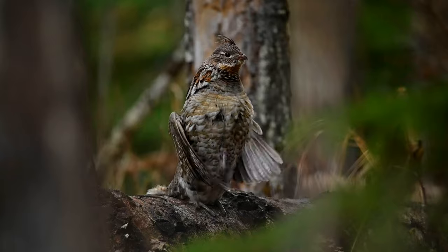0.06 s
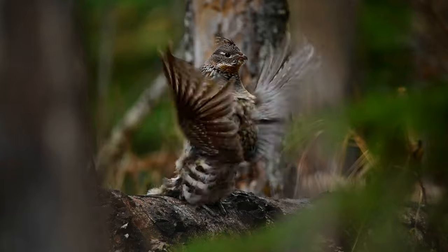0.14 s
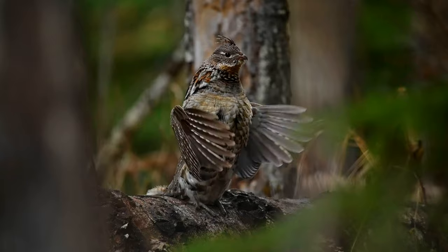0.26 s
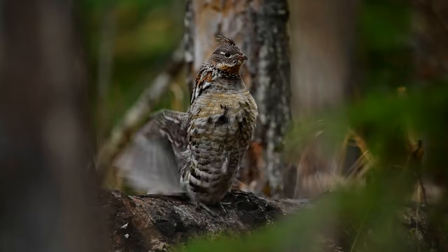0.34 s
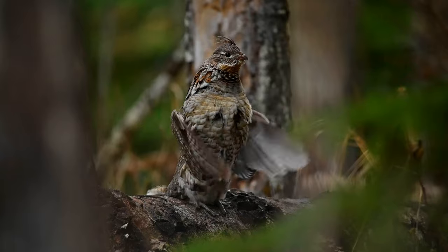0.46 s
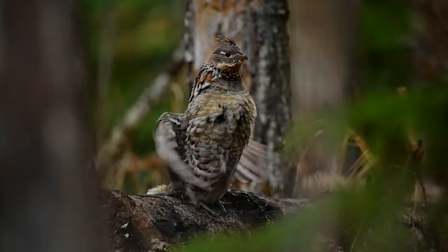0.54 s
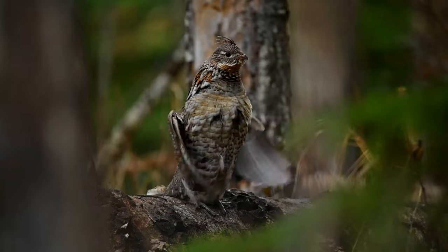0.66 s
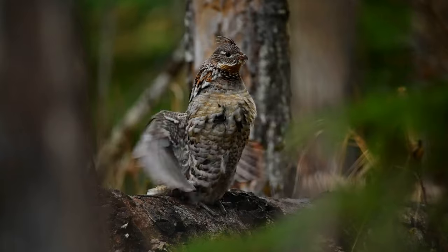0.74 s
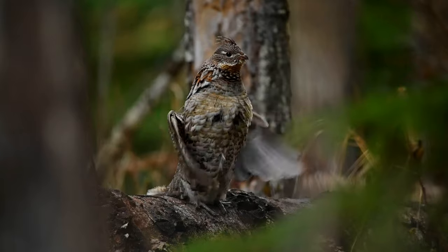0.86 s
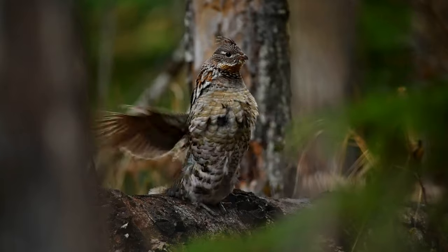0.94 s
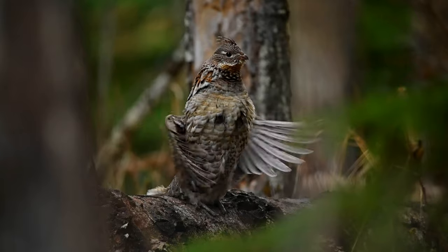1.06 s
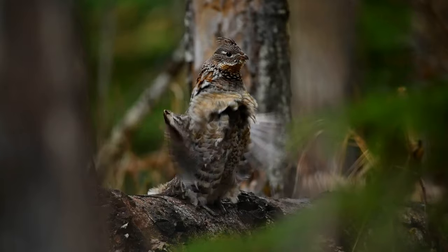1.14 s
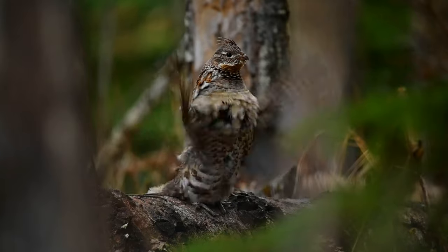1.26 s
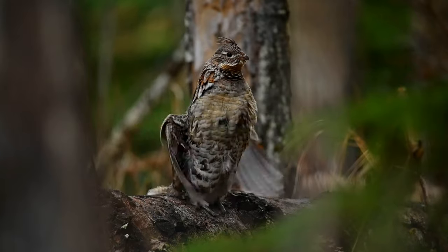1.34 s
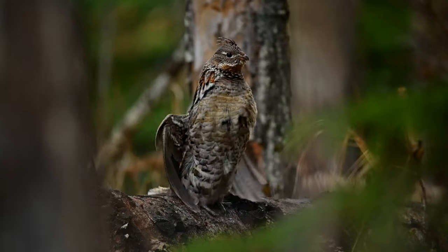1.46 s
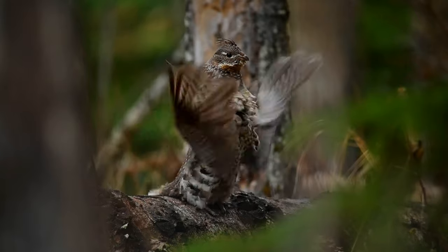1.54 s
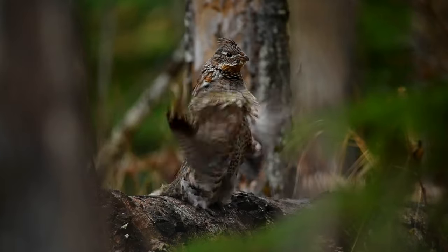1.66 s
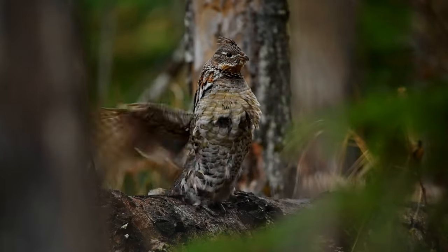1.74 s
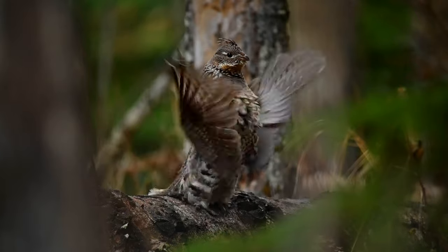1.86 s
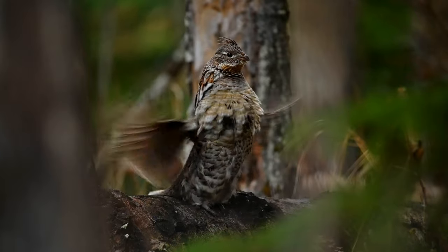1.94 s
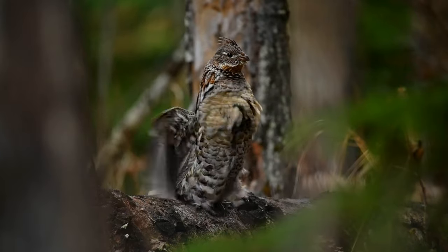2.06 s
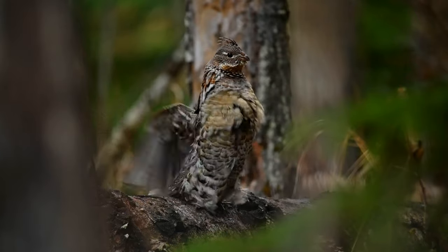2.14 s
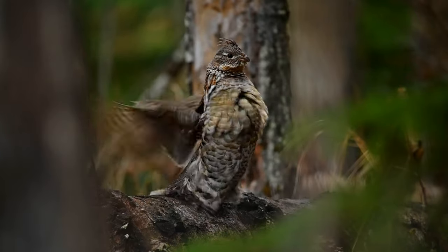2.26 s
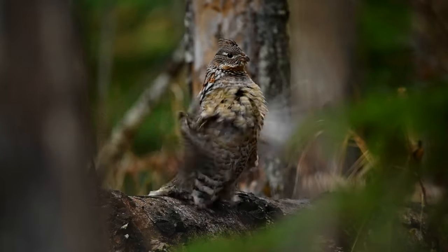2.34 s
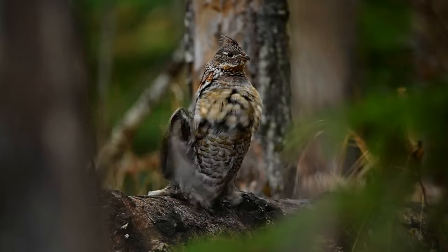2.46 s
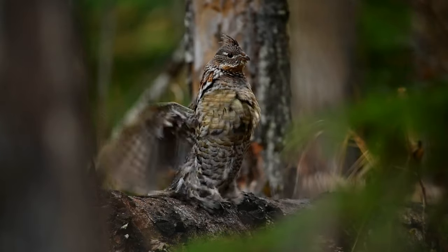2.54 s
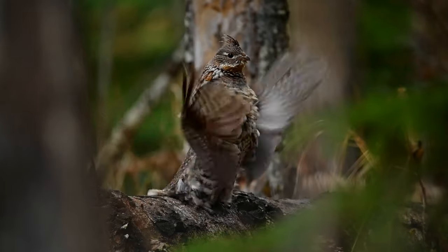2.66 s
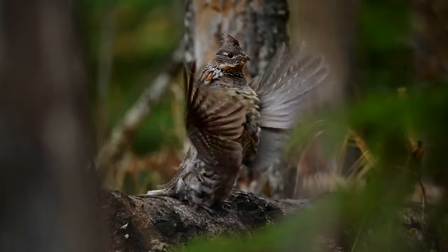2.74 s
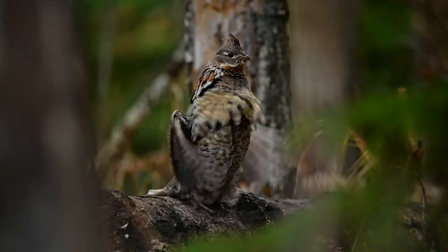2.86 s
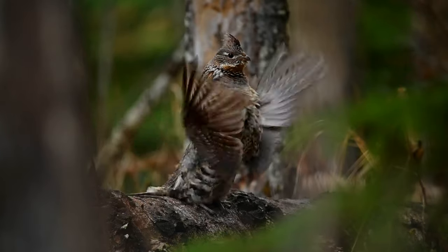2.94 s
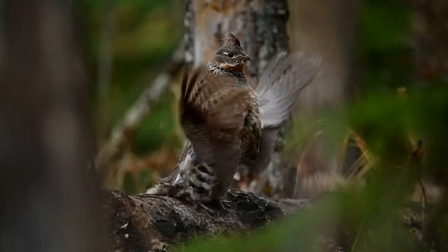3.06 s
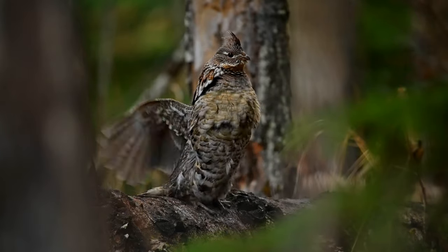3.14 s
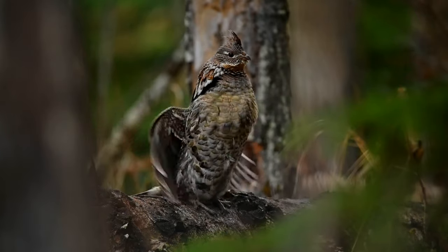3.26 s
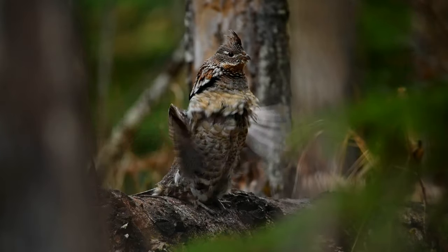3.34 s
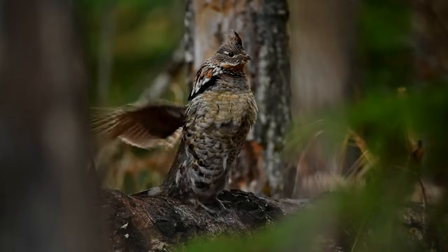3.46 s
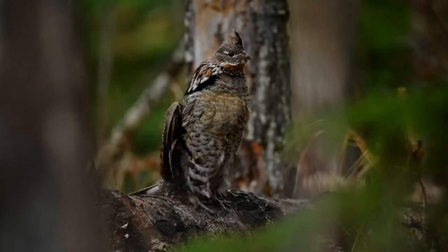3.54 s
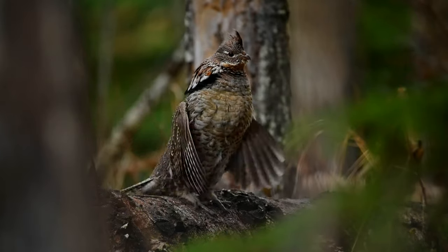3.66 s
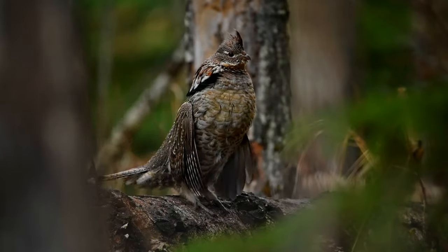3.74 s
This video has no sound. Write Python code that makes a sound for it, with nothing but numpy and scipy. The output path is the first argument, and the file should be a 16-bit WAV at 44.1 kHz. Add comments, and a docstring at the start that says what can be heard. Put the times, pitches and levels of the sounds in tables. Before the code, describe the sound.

Grouse wing drumming, close and nearly all in the left channel. Deep, soft thumps, each led by a faint feathery swish, begin at 0.2 s about four per second, and quicken steadily to a low churning whir with rustling, flicking feathers around 2.4 s. They then slow and weaken until 3.6 s, echoing among trees. Faint thin chirps between 0.3 and 1.9 s; very quiet distant murmur, hum and hiss throughout.

```python
"""From the start a distant murmur, rumble and hiss (coloured noise) lie under the wood; faint hums (sines) come and go.
A ruffed grouse, close and almost wholly on the left, drums on a log: each wing stroke shoves out one deep
pulse of air (a damped resonance) led by a swish of feathers (shaped noise), and trunks echo the thumps.
Early on a small bird gives thin high chirps (gliding sines). The strokes quicken to a whir of churning air,
rustling and flicking feathers (noise), then slow and fade."""
import sys
import numpy as np
from scipy import signal
from scipy.fft import rfft, irfft
from scipy.io import wavfile
from scipy.ndimage import uniform_filter1d

SR = 44100
rng = np.random.default_rng(int(sys.argv[2]) if len(sys.argv) > 2 else 0)


def digitize_waveform(pressure):
    """Quantize a signal to 16-bit integers and store it at the path in sys.argv[1].

    Rows of a 2-D input are taken as channels; values are limited to [-1, 1].
    """
    field = np.atleast_2d(pressure).T
    bounded = np.clip(field, -1, 1)
    quanta = np.round(bounded * 32767).astype(np.int16)
    wavfile.write(sys.argv[1], SR, quanta)


N = 169785
T = np.arange(N) / SR  # time [s]


def undb(db):
    """Logarithmic level: decibels to amplitude gain."""
    return 10 ** (np.asarray(db) / 20)


def level_at(points):
    """Linear interpolation in decibels: the level [dB] over time through (time, level) points."""
    time, db = np.array(points).T
    return np.interp(T, time, db)


def noise(points):
    """Spectral shaping: white noise coloured by (frequency, density) points, scaled to rms 1."""
    hz, db = np.array(points, float).T
    f = np.fft.rfftfreq(N, 1 / SR) + 1  # 1 Hz up, so that the logarithm exists at zero
    gain = undb(np.interp(np.log(f), np.log(hz), db))
    x = irfft(rfft(rng.standard_normal(N)) * gain, N)
    return x / x.std()


def walk(rate):
    """Random modulation: held random steps at a rate [Hz], smoothed over one step, with a spread of 1."""
    step = max(int(SR / rate), 1)
    held = np.repeat(rng.standard_normal(N // step + 1), step)
    x = uniform_filter1d(held, step)[:N]
    return x / x.std()


def on_left(x, right_db):
    """Level difference between channels: full on the left, right_db relative to it on the right."""
    return np.array([x, x * undb(right_db)])


def woods(x, t60, onset):
    """Multiple scattering: many trunks return a noise tail that builds up, then decays 60 dB in t60 [s]."""
    decay = np.exp(-np.log(1000) * T / t60)
    build_up = 1 - np.exp(-(T / onset) ** 2)
    tail = rng.standard_normal(N) * decay * build_up
    unit_energy_tail = tail / np.sqrt(np.sum(tail ** 2))
    return signal.fftconvolve(x, unit_energy_tail)[:N]


# colours of the distant murmur, low rumble and fine hiss: (frequency [Hz], relative density [dB per Hz])
MURMUR_COLOUR = [(20, -14), (45, -9), (80, 3.5), (130, -4.5), (220, 1), (350, -1.5), (550, -2.5),
                 (800, -0.5), (1100, -6.5), (1400, -18), (2000, -29), (4000, -25.5), (15500, -33)]
RUMBLE_COLOUR = [(15, -45), (28, -24), (42, -18.5), (80, 3), (120, -12), (165, -6.5), (220, -19),
                 (400, -35), (1500, -54), (15500, -64)]
HISS_COLOUR = [(100, -12), (1500, -2), (2450, -8), (3300, -5), (5800, -3.5), (9000, -2), (12000, -3),
               (15500, -2.5)]
# slow course of the murmur: (time [s], level [dB])
MURMUR_COURSE = [(0, -64.5), (1.0, -64.5), (1.7, -63), (2.4, -63.5), (3.2, -63), (3.85, -63)]
RUMBLE_LEFT_DB, RUMBLE_RIGHT_DB, HISS_LEFT_DB, HISS_RIGHT_DB = -47.5, -60, -67, -74.5


def background():
    """Coherence: the murmur is alike in both channels, so centred; rumble and hiss are independent."""
    murmur = noise(MURMUR_COLOUR) * undb(level_at(MURMUR_COURSE))
    left = undb(RUMBLE_LEFT_DB) * noise(RUMBLE_COLOUR) + undb(HISS_LEFT_DB) * noise(HISS_COLOUR)
    white_hiss = rng.standard_normal(N)
    right = undb(RUMBLE_RIGHT_DB) * noise(RUMBLE_COLOUR) + undb(HISS_RIGHT_DB) * white_hiss
    return murmur + np.array([left, right])


# distant tones: (start [s], end [s], mean frequency [Hz], mid-tone rms level before sway [dB])
HUM_TONES = [(.3, 0.947, 434, -74.5), (0.903, 1.847, 437, -72), (1.75, 2.997, 437, -75),
             (2.895, 3.793, 436, -70.5), (1.96, 3.112, 591, -75), (2.912, 3.897, 77.4, -66)]


def hum(waver=0.0019, sway_db=1.2, fade_s=0.11):
    """Frequency and amplitude modulation: faint far-off sines waver in pitch and sway in level."""
    x = np.zeros(N)
    for start, end, hz, db in HUM_TONES:
        fade = np.clip(np.minimum(T - start, end - T) / fade_s, 0, 1)
        envelope = fade * undb(db + sway_db * walk(6.1))
        phase = 2 * np.pi * np.cumsum(hz * (1 + waver * walk(12))) / SR
        x += np.sqrt(2) * envelope * np.sin(phase)  # root 2 gives the sine an rms of 1
    return x


# chirps: (start [s], length [s], start frequency [Hz], end frequency [Hz],
#          direct mid-note rms level before fuzz [dB], level sent to the trees [dB])
CHIRP_NOTES = [(.312, 0.033, 6750, 7650, -69.5, -70), (0.46, 0.049, 6960, 7900, -69, -63.5),
               (1.236, 0.05, 7000, 7600, -63, -61.5), (1.407, 0.056, 7090, 6950, -67, -67),
               (1.825, 0.038, 7480, 7800, -59.5, -67)]
CHIRP_FUZZ_DB, CHIRP_FUZZ_HZ = -10, 597  # depth and rate of the random level modulation
CHIRP_T60_S, CHIRP_RIGHT_DB = .38, -3


def small_bird(waver=0.00604, blur_hz=450):
    """Frequency glide and scattering: thin whistles sweep in pitch, and much of each is blurred by the trees."""
    near, far = np.zeros(N), np.zeros(N)
    wobble = 1 + waver * walk(400)
    for at, length, start_hz, end_hz, db, far_db in CHIRP_NOTES:
        u = np.clip((T - at) / length, 0, 1)  # progress through the note
        hz = (start_hz + (end_hz - start_hz) * np.sin(u * np.pi / 2)) * wobble
        envelope = np.sqrt(2 * 4 * u * (1 - u))  # a rounded arch, silent at both ends
        note = envelope * np.sin(2 * np.pi * np.cumsum(hz) / SR)
        near += undb(db) * note
        far += undb(far_db) * note
    near = near * (1 + undb(CHIRP_FUZZ_DB) * walk(CHIRP_FUZZ_HZ))
    scattered = woods(far * walk(blur_hz), CHIRP_T60_S, onset=0.015)
    return on_left(near + scattered, CHIRP_RIGHT_DB)


# colours of the churned air and of the draught in both channels: (frequency [Hz], relative density [dB per Hz])
CHURN_COLOUR = [(15, -50), (28, -24), (40, -6), (70, -4), (120, -3.5), (165, 2.5), (185, -3.5), (215, -23),
                (300, -36), (1000, -70)]
DRAUGHT_COLOUR = [(10, -30), (25, -10), (38, 3), (52, -4), (80, -23), (300, -60)]
WHIR_S, WHIR_WIDTH_S = 2.4, 0.089  # centre of the swell, and time from there to 1/e
CHURN_DB, DRAUGHT_DB = -35.5, -56  # rms at the height of the swell


def churn():
    """Turbulence: in the whir the strokes crowd together and leave the air churning, a swell of low noise."""
    swell = np.exp(-((T - WHIR_S) / WHIR_WIDTH_S) ** 2)
    churned = on_left(undb(CHURN_DB) * noise(CHURN_COLOUR), THUMP_RIGHT_DB)
    draught = undb(DRAUGHT_DB) * noise(DRAUGHT_COLOUR)
    return swell * (churned + draught)


# wing strokes, also played by thumps(): (time [s], thump level before THUMP_DB [dB], thump pitch [ratio],
#                                         swish level before SWISH_DB or LIFT_DB [dB])
STROKES = [(0.2132, -13, 1.0, -53.5), (0.4497, -13.5, 1.0, -52.5), (0.6615, -14, 1.0, -51.5),
           (0.8554, -13.2, 1.0, -52.5), (1.0333, -13.5, 0.99, -52.5), (1.1955, -14, 0.99, -53),
           (1.3454, -14.5, 0.99, -53.5), (1.4832, -16, 0.96, -53), (1.6107, -17.5, 0.96, -54),
           (1.7285, -15.5, 0.99, -54.5), (1.838, -15, 1.0, -55), (1.9376, -15.5, 0.98, -53),
           (2.0282, -18, 0.97, -54.5), (2.111, -20, 0.95, -55.0), (2.1856, -20, 0.9, -55.5),
           (2.2544, -19, 0.97, -55.5), (2.3145, -18.0, 1.0, -56.5), (2.3648, -18.5, 0.98, -57),
           (2.4093, -20.5, 0.89, -53), (2.461, -17.6, 1.0, -55), (2.5164, -19, 1.0, -58.5),
           (2.5799, -19, 0.95, -62.5), (2.6495, -19.5, 0.93, -58), (2.7275, -19, 0.97, -59.5),
           (2.8146, -20.5, 0.92, -56), (2.9091, -19.5, 0.99, -56), (3.013, -19.7, 1, -57),
           (3.1281, -21.5, 1, -56.5), (3.2556, -22.5, 0.96, -59), (3.3947, -23, 0.97, -59.5),
           (3.554, -25.6, 0.99, -62.0)]
SWISH_DB, SWISH_LEAD_S, SWISH_ATTACK_S, SWISH_HOLD_S, SWISH_DECAY_S = -0.5, 0.015, 0.0039, 0.0052, 0.023
SWISH_TAIL_DB, SWISH_TAIL_S = -12, 0.033
LIFT_DB, LIFT_LEAD_S, LIFT_WIDTH_S = -13, 0.023, 0.012  # lead of the peak over the stroke, half-width


def swish_envelope(age):
    """Amplitude envelope: the wing lifts with a faint brush, then each swish rises fast and decays."""
    attack = np.minimum(age / SWISH_ATTACK_S, 1)
    body = np.exp(-np.maximum(age - SWISH_ATTACK_S - SWISH_HOLD_S, 0) / SWISH_DECAY_S)
    tail = undb(SWISH_TAIL_DB) * np.exp(-age / SWISH_TAIL_S)
    shape = attack * (body + tail)
    envelope = np.zeros(N)
    for at, _, _, db in STROKES:
        envelope += undb(db + SWISH_DB) * np.interp(T - at + SWISH_LEAD_S, age, shape, 0, 0)
        lift = np.maximum(1 - np.abs(T - at + LIFT_LEAD_S) / LIFT_WIDTH_S, 0)
        envelope += undb(db + LIFT_DB) * lift
    return envelope


# feather colour: (frequency [Hz], relative density [dB per Hz])
FEATHER_COLOUR = [(300, -11.5), (900, -12.5), (1400, -5), (2000, -10), (2450, -15), (3100, -7.5),
                  (4200, -2.5), (5500, 1), (8500, -4), (10500, -11.5), (13000, -18.5), (15500, -25.5)]
# unbroken feather rustle: (time [s], level before flutter and grain [dB])
RUSTLE_COURSE = [(0, -72), (1.2, -71.5), (1.7, -66.5), (2.15, -64.5), (2.27, -60.5), (2.35, -50),
                 (2.44, -54.5), (2.53, -55), (2.63, -61.5), (2.9, -65.5), (3.2, -71.5), (3.85, -74.5)]
# quills flicking against each other: (time [s], level before the flick shape halves it [dB])
QUILL_FLICKS = [(1.814, -61), (1.8272, -43), (1.8811, -41.5), (1.946, -43), (2.2242, -40.5), (2.288, -35),
                (2.3824, -35.5), (2.428, -37), (2.436, -40), (2.482, -30.5), (2.683, -41), (2.687, -39.5)]
FLICK_DECAY_S = 0.0012
TICK_COUNT, TICK_DB, TICK_SCATTER_DB = 130, 7.5, 3.5  # level relative to the rustle, before halving
FEATHER_RIGHT_DB = -40.5


def feathers(grain_db=1.5, grain_rate=700, flutter_db=1.5, ragged_db=0.5):
    """Friction noise: a grainy swish leads each thump; the rustle never stops, barbs tick and quills flick."""
    age = T[:SR // 2]
    rustle = undb(level_at(RUSTLE_COURSE) + flutter_db * walk(70))
    swish = swish_envelope(age) * undb(ragged_db * walk(180))
    grain = undb(grain_db * walk(grain_rate))
    envelope = np.hypot(rustle, swish) * grain  # independent noises add in power

    flick = np.exp(-age / FLICK_DECAY_S) / 2
    for at, db in QUILL_FLICKS:
        envelope += undb(db) * np.interp(T - at, age, flick, 0, 0)

    ticks = np.zeros(N)
    tick_db = TICK_DB + TICK_SCATTER_DB * rng.standard_normal(TICK_COUNT)
    ticks[rng.integers(0, N, TICK_COUNT)] = undb(tick_db)
    envelope += rustle * signal.fftconvolve(ticks, flick)[:N]
    return on_left(envelope * noise(FEATHER_COLOUR), FEATHER_RIGHT_DB)


# near reflections of the thump: (delay [s], level relative to the direct pulse [dB])
NEAR_ECHOES = [(.0123, -6), (0.041, -17.5)]
AIR_HZ, AIR_Q = 124.45, 3.15  # resonance at pitch ratio 1
SOFT_HZ, LOW_CUT_HZ, HIGH_CUT_HZ = 90, 40, 210  # SOFT_HZ also scales with the pitch ratio


def air_pulse(pitch, size=16384):
    """Damped resonance: one shove of air, rounded by the soft wing, with near reflections; peak 1, centred."""
    f = np.fft.rfftfreq(size, 1 / SR) + 1e-3  # keeps the low cut finite at zero
    scaled_f = f / pitch
    s = 1j * scaled_f / AIR_HZ
    resonance = s / (1 + s / AIR_Q + s * s)
    soft_wing = 1 + (scaled_f / SOFT_HZ) ** 6
    low_cut = 1 + (LOW_CUT_HZ / f) ** 8
    high_cut = 1 + (f / HIGH_CUT_HZ) ** 24
    rounding = np.sqrt(soft_wing * low_cut * high_cut)
    near = 1 + sum(undb(db) * np.exp(-2j * np.pi * f * delay) for delay, db in NEAR_ECHOES)
    pulse = np.roll(irfft(resonance / rounding * near), size // 2)
    return pulse / np.abs(pulse).max()


THUMP_DB, THUMP_RIGHT_DB = 1, -45
FOREST_DB, FOREST_RIGHT_DB, FOREST_T60_S, FOREST_ONSET_S = -17.5, -29, 1.4, 0.021


def thumps():
    """Superposition and reverberation: a pulse of air for every stroke, rolling on among the trees."""
    x = np.zeros(N)
    for at, db, pitch, _ in STROKES:
        pulse = air_pulse(pitch)
        pulse_time = (np.arange(len(pulse)) - len(pulse) // 2) / SR
        x += undb(db + THUMP_DB) * np.interp(T - at, pulse_time, pulse, 0, 0)
    # each channel has its own scatter
    far_left = woods(x, FOREST_T60_S, FOREST_ONSET_S)
    far_right = undb(FOREST_RIGHT_DB) * woods(x, FOREST_T60_S, FOREST_ONSET_S)
    return on_left(x, THUMP_RIGHT_DB) + undb(FOREST_DB) * np.array([far_left, far_right])


def scene():
    """Linear superposition: the drumming grouse in its wood."""
    return background() + hum() + small_bird() + churn() + feathers() + thumps()


def record(dry):
    """Band limiting: a steep elliptic low-pass cuts the top above 15.8 kHz."""
    low_pass = signal.ellip(10, .1, 80, 15800, fs=SR, output="sos")  # order, ripple [dB], rejection [dB]
    return signal.sosfilt(low_pass, dry)


dry = scene()
out = record(dry)
digitize_waveform(out)
```